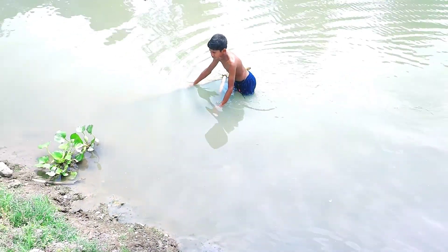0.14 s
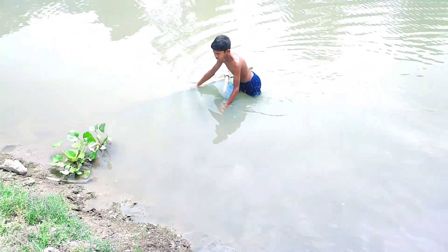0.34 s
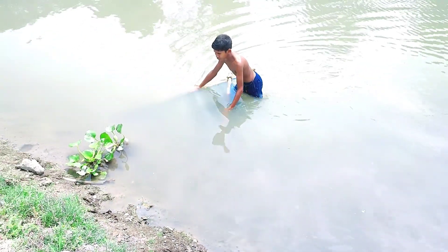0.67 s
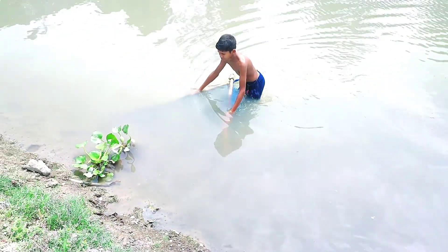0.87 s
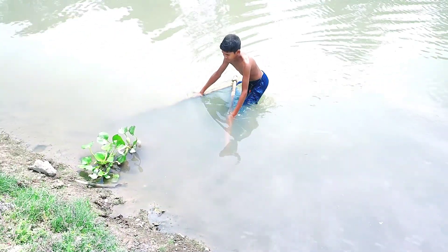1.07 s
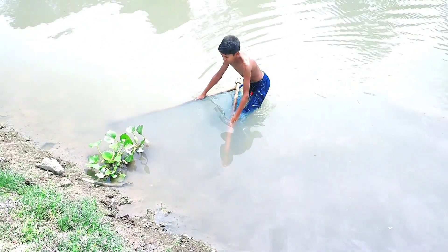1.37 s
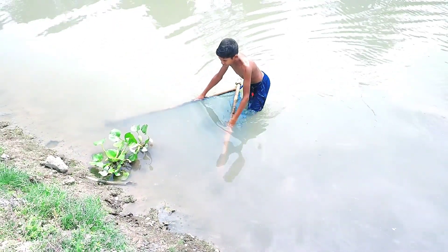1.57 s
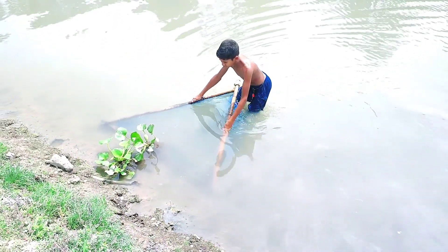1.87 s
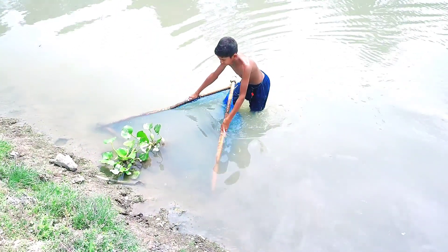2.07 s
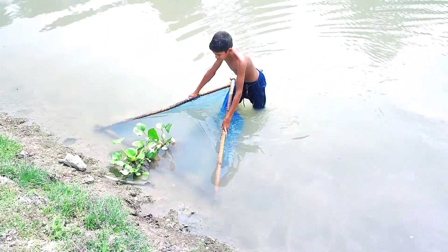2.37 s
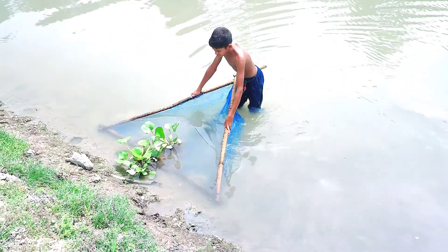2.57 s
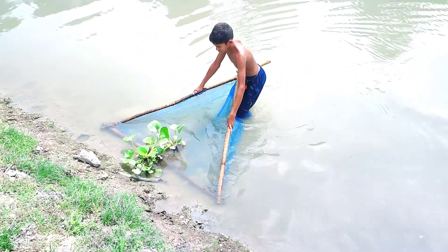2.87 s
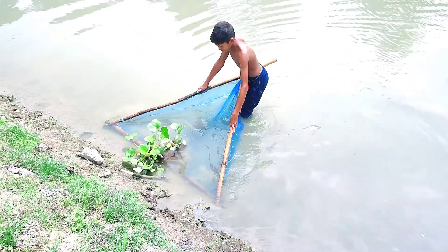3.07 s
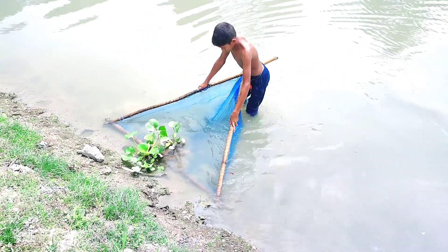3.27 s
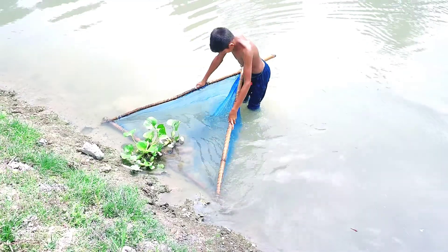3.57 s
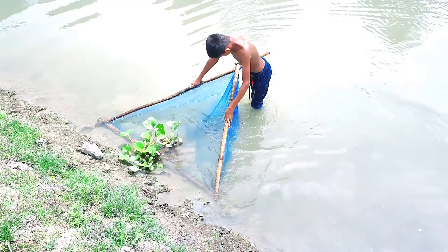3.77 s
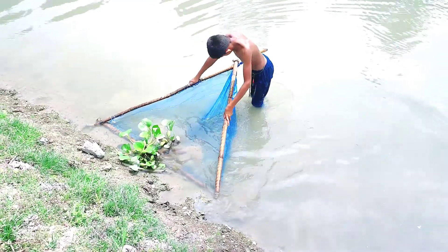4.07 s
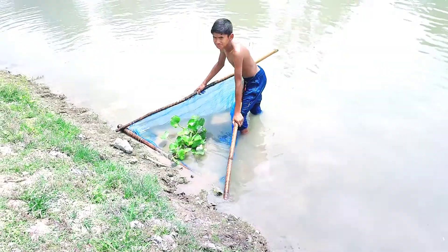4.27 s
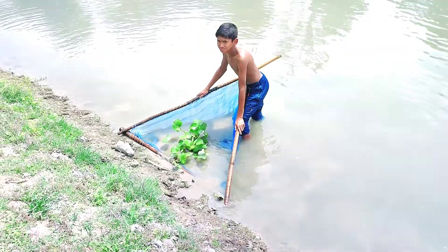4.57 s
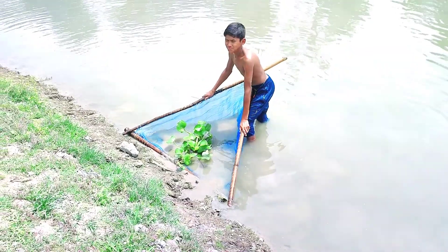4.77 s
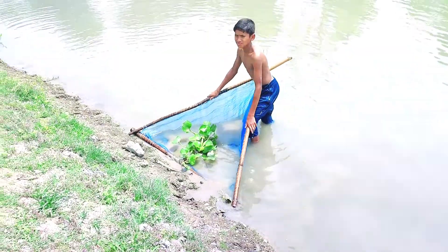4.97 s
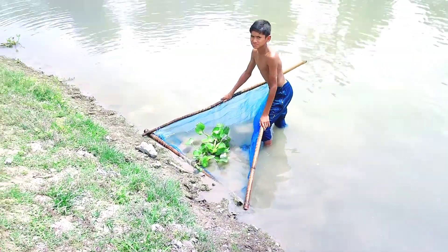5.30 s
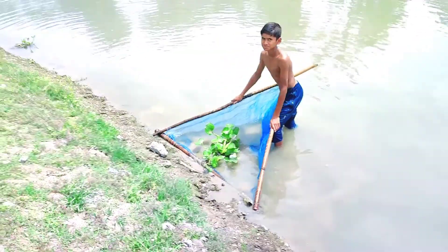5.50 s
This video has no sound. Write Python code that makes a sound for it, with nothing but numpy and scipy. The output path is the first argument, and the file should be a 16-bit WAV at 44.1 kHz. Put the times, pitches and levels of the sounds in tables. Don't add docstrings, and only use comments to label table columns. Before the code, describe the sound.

A close cicada dominates from the start, right of centre: short, dry, buzzing rasps around 5 to 7 kHz, roughly seven a second, over a thin grainy chorus of far insects and a very quiet wash of water and leaves. A soft wind flutter touches the microphone near 0.35 s; dry camera-body ticks follow, clearest at 1.1 s and 2.7 s. From about 2 to 3.9 s a faint bird gives short upward whistles, every quarter second. The rasps quicken to about nine or ten a second after 3 s, peak around 3.7 to 4.0 s, then become weaker and duller. Tiny watery blips and plops ring faintly at 3.5 to 4.1 s. From 4.9 s a second insect flicks its wings rapidly on the left. Wind and hand rustling build after 5 s, with low buffets and a strong thump on the right near 5.57 s.

```python
import sys
import numpy as np
from scipy import signal
from scipy.fft import rfft, irfft
from scipy.io import wavfile
from scipy.ndimage import uniform_filter1d

SR = 44100
rng = np.random.default_rng(int(sys.argv[2]) if len(sys.argv) > 2 else 0)


def to_linear_factor(level_db):
    exponent = np.asarray(level_db, float) / 20
    return 10 ** exponent


def persist_wave(psi):
    counts = np.round(np.clip(psi, -1, 1) * 32767).astype(np.int16)
    wavfile.write(sys.argv[1], SR, np.atleast_2d(counts).T)


N = 248724
CLOCK = np.arange(N) / SR

# start in seconds, peak in dB, length in
# seconds.
CICADA_PHRASES = [(-.04, -39.5, 0.081), (.115, -39, 0.091), (.267, -38.5, .082), (0.427, -39, 0.088),
                  (0.578, -39.5, 0.071), (0.729, -39.5, 0.06), (0.856, -39, 0.074), (1.001, -37, 0.076),
                  (1.154, -36.5, 0.073), (1.304, -36.5, 0.087), (1.442, -36, 0.067), (1.531, -43.5, 0.054),
                  (1.571, -36.5, 0.079), (1.704, -37, 0.077), (1.848, -37.5, 0.079), (1.979, -37.5, 0.099),
                  (2.109, -39, 0.13), (2.236, -37.5, 0.083), (2.36, -37, .084), (2.502, -37, 0.076),
                  (2.629, -37.5, 0.091), (2.748, -37, 0.059), (2.824, -40.5, .065), (2.864, -36.5, 0.056),
                  (2.983, -36.5, 0.062), (3.107, -35, .067), (3.234, -34.5, 0.072), (3.357, -36, 0.087),
               (3.471, -35, 0.083), (3.568, -34.5, 0.066), (3.658, -38, .065), (3.685, -32.5, .055),
               (3.7955, -32, 0.065), (3.904, -31.5, .07), (4.017, -32, 0.08), (4.129, -34.5, 0.045),
               (4.228, -37, 0.053), (4.335, -39, 0.071), (4.434, -39, .056), (4.539, -38.5, .051),
               (4.634, -38, .039), (4.727, -37.5, 0.045), (4.814, -38.5, 0.055), (4.901, -39.5, 0.07),
               (5.014, -41, .08), (5.108, -41.5, 0.045), (5.179, -40, 0.075), (5.294, -41.5, 0.072),
               (5.389, -42, 0.061), (5.48, -41, 0.05), (5.572, -47.5, 0.057)]
# time in seconds, left over right in dB, low rib band in dB,
# treble reaching the ports in dB.
BEARING = [(0, -14, -1, -8), (.8, -11, 2.5, -6.5), (1.5, -10, -2, -10.5), (1.95, -9, -4, -9),
           (2.25, -10.5, -1, -11.5), (3.1, -13, -1, -5.5), (3.9, -17, -3.5, -13.5), (4.3, -14, 1, -17),
           (4.8, -12, 1, -17.5), (5.64, -7, 1.5, -2)]
# time in seconds, level in dB, left over right in dB.
CHORUS_LEVEL = [(0, -48, -10), (2.1, -50.5, -10), (3.2, -50.5, -16), (4.0, -48.5, -15), (4.5, -50.5, -6),
                (5.4, -50.5, -16), (5.64, -53.5, -3)]
# frequency in Hz, density in dB per Hz.
CHORUS_COLOUR = [(2350, -77), (4000, -14), (4200, -59), (4450, 0.5), (4670, -22), (5370, -5.5), (6580, -5),
                 (8290, -8.5), (10100, -9), (10900, -13), (11400, -14), (13100, -11.5), (14400, -13)]
# time in seconds, strength in dB.
BREEZE = [(0, -57), (.9, -56), (1.4, -59), (3.7, -59), (4.1, -57), (4.8, -55), (5.0, -46.5), (5.2, -43),
          (5.5, -42.5), (5.64, -34.5)]
# middle in seconds, peak in dB, half length in seconds, left over right in dB.
GUSTS = [(0.243, -50, 0.027, -11), (0.305, -50.5, 0.024, 13), (0.352, -40.5, 0.015, -22),
         (.53, -48, 0.086, -0.5), (0.75, -49, 0.064, -4), (3.87, -57, 0.049, 7), (4.194, -51, 0.11, -3),
         (4.263, -55.5, 0.027, -10), (4.455, -53, 0.036, 15), (4.571, -44.5, .035, 1),
         (4.951, -46, 0.035, 20), (5.155, -41.5, 0.05, -1), (5.214, -42, 0.029, -1), (5.34, -45.5, .04, 19),
         (5.57, -35.5, .04, -13)]
# time in seconds, peak in dB, length in seconds (minus for suction),
# left over right in dB.
BUFFETS = [
    (.357, -32, -.006, -14),
    (5.527, -25, .005, -14),
    (5.57, -15.5, .0036, -18),
    (5.618, -25, -.006, -10),
]
# time in seconds, level in dB.
AIR_LEVEL = [(0, -66), (2.7, -65), (3.93, -66.5), (4.6, -70), (5.07, -66.5), (5.64, -69.5)]
# frequency in Hz, density in dB per Hz.
AIR_COLOUR = [(71, -6.5), (120, -1.5), (214, -6.5), (372, -7), (425, -9.5), (963, -11), (1150, -13),
              (1280, -13), (1440, -14), (2420, -10), (3800, -11.5), (4250, -11), (5460, -57), (9240, -120)]
# frequency in Hz, left-right likeness from 0 to 1.
AIR_LIKENESS = [(200, 0.78), (500, 0.51), (900, 0.038), (1500, 0.0067)]
# time in seconds, peak in dB, left over right in dB.
LONE_CLICKS = [
    (.098, -42, -9),
    (.411, -42, -8),
    (.693, -37, -8),
    (.845, -40, -8),
    (.985, -38.5, -17),
    (1.123, -38, -12),
    (1.134, -46, -8),
    (1.273, -48, -10),
    (1.289, -43, -11),
]
# start in seconds,
# length in seconds, rms in dB, centre in Hz, spread in octaves.
RUSTLES = [(.58, 0.2, -66.5, 2440, 0.5), (1.049, 0.055, -59, 980, 0.67), (1.624, .15, -62, 2350, 1.1),
           (4.808, .15, -63.5, 3490, 0.14), (4.878, 0.16, -67.5, 1524, 0.95),
           (5.062, 0.019, -50, 146, 0.28), (5.131, 0.036, -44, 229, 0.54), (5.164, 0.045, -57, 1670, 0.69),
           (5.263, .012, -51, 1340, 1.06), (5.446, 0.009, -52.5, 2200, 1.3),
           (5.46, 0.052, -43.5, 1800, 1.3), (5.5, 0.035, -64, 2200, .9), (5.51, 0.041, -48.5, 188, 0.43),
           (5.558, .05, -42.5, 228, 0.44)]
# time in seconds, peak in dB, pitch in Hz, length in cycles.
TICKS = [(.688, -36.5, 554, 1), (.742, -51, 528, 1.7), (.948, -50, 743, 2.1), (1.054, -34, 1040, 3.8),
         (1.082, -24, 950, 3.46), (1.17, -41.5, 1000, 2.8), (1.295, -46, 805, 1.7), (1.32, -42, 1120, 3.9),
         (2.472, -57, 910, 2.8), (2.5, -46, 706, 3.1), (2.519, -37.5, 660, 2.2), (2.574, -56, 517, 2.4),
         (2.676, -32, 1850, 1.06), (2.944, -49, 510, 1.8), (2.952, -39, 825, 2.5), (3.016, -45, 1010, 4.2),
         (3.042, -38.5, 770, 2.4), (3.314, -51.5, 690, 2.8), (3.528, -46, 1180, 1.3),
         (4.111, -43.5, 630, 1.6)]
# start in seconds, length in seconds, loudest level in dB.
BIRD_NOTES = [
    (1.99, 0.046, -57),
    (2.254, .078, -62.5),
    (2.555, 0.066, -57),
    (2.816, 0.073, -50.5),
    (3.083, 0.061, -51.5),
    (3.339, .072, -49.5),
    (3.597, 0.083, -54.5),
    (3.863, 0.072, -53.5),
]
# start in seconds, peak in dB, pitch in Hz, rise as a factor, time to fall 60 dB in seconds.
BUBBLES = [
    (3.527, -55, 1194, 1.02, 0.11),
    (3.884, -50, 694, 1.1, 0.13),
    (3.903, -52, 2450, .89, 0.053),
    (3.927, -45.5, 2390, 1.06, 0.053),
    (3.988, -55.5, 945, 1.04, 0.092),
    (4.057, -62, 870, .73, .1),
    (4.085, -59, 895, 1.06, .061),
]
# frequency in Hz, threshold in dB.
MASK = [(900, -14), (1500, -4.2), (3000, -3), (4150, -.5), (4500, -9), (9800, -9), (10900, -1),
        (11700, 1.5), (12600, 0), (14000, -.5)]


def evened(x):
    return x / np.sqrt(np.mean(x ** 2) + 1e-20)


def read(points, hz):
    f, value = np.transpose(points)
    return np.interp(np.log(hz + 1), np.log(f + 1), value)


def sides(pan_db):
    ratio = to_linear_factor(np.asarray(pan_db))
    return np.sqrt(2 / (1 + ratio ** 2)) * np.array([ratio, np.ones_like(ratio)])


def add(mix, start, sound, pan_db):
    part = mix[:, round(start * SR):][:, :sound.shape[-1]]
    part += (sides(pan_db)[:, None] * sound)[:, :part.shape[1]]


def band(x, lo_hz, hi_hz):
    return signal.sosfilt(signal.cheby2(10, 45, [lo_hz, hi_hz], "bandpass", fs=SR, output="sos"), x)


def resonate(x, hz, width_hz):
    turn = np.exp(2j * np.pi * np.cumsum(hz * np.ones(x.shape[-1])) / SR)
    r = np.exp(-np.pi * width_hz / SR)
    return 2 * (turn * signal.lfilter([(1 - r) ** 2], [1, -2 * r, r * r], x / turn)).real


def noise(colour_db, size, same=0., patchy_db=0., flicker_db=0.):
    hop, hz = size // 4, np.fft.rfftfreq(size, 1 / SR)[:, None]
    frames = N // hop + 5
    a, b, c, d, patches = rng.standard_normal((frames, len(hz), 5)).T
    patches = uniform_filter1d(patches, size=size // 64, axis=0)
    patches = evened(uniform_filter1d(patches, size=6, axis=1))
    flicker = rng.standard_normal((frames, 2)).T[:, None]
    left = a + 1j * b
    right = same * left + np.sqrt(1 - same ** 2) * (c + 1j * d)
    level_db = colour_db(hz, np.arange(frames) * hop / SR) + patchy_db * patches + flicker_db * flicker
    z = np.array([left, right]) * to_linear_factor(level_db)
    return signal.istft(z, nperseg=size, noverlap=size - hop)[1][:, :N]


def buckling(age, per_s, uneven, size_db, hiss):
    index = np.arange(N)
    wander = np.cumsum(evened(uniform_filter1d(rng.standard_normal(N), size=300))) / SR
    wander -= wander[index - np.minimum(age * SR, index).astype(int)]
    turns = per_s * (age + uneven * wander)
    burst_start = (index - turns % 1 / per_s * SR).astype(int)
    luck = rng.standard_normal(N)[burst_start // 128]
    burst = to_linear_factor(size_db * luck) * np.exp(-(turns % 1) / .35)
    return evened((hiss + evened(burst)) * rng.standard_normal((2, N)))


def cicada():
    rows = np.array(CICADA_PHRASES)
    phrase = np.searchsorted(rows[:, 0], CLOCK) - 1
    start, peak_db, length = rows[phrase].T
    s, *view = np.transpose(BEARING)
    pan_db, low_db, high_db = (np.interp(CLOCK, s, column) for column in view)
    age = CLOCK - start
    u = (age / length).clip(0, 1)
    pitch_luck, treble_luck = uniform_filter1d(rng.standard_normal((60, 2))[phrase].T, size=60)

    after_db = -7 * np.tanh(np.maximum(age - length + 0.0048, 0) / 0.012) - 170 * np.maximum(age - length, 0)
    snap_db = 1.8 * np.exp(-age / .006)
    level = uniform_filter1d(to_linear_factor(peak_db - 9.5 + snap_db + after_db), size=30)
    swell = to_linear_factor(-18 * (u - .55) ** 2)
    lift = uniform_filter1d(1 - np.exp(-age / 0.028), size=60)

    drive = buckling(age, per_s=285, uneven=0.18, size_db=-2.5, hiss=1.0)
    ridge = evened(resonate(drive, 5900 + 1150 * lift + 150 * pitch_luck, 1020))
    main = ridge + to_linear_factor(-2.0) * evened(resonate(drive, 6440, 1600))
    main = main * to_linear_factor(-2.0 - 10.7 * (u - .4) ** 2)
    low = evened(resonate(drive, 4700 + 200 * lift, 700)) * to_linear_factor(low_db - 2.0 - 6.6 * u)
    wide = evened(band(drive, 4740, 10550))
    high = evened(resonate(drive, 10170, 1360)) + to_linear_factor(4.5) * wide
    high = high + to_linear_factor(-3.5) * evened(resonate(drive, 13360, 1300))

    shade = sides(pan_db)
    song = shade * main + shade * to_linear_factor([[2.5], [-.4]]) * low
    song = song + sides(0.034 * pan_db) * to_linear_factor(high_db - 2.5 + 1.5 * treble_luck) * swell * high
    return band(level * song, 4200, 16500)


def chorus():
    s, db, pan_db = np.transpose(CHORUS_LEVEL)
    far = noise(lambda hz, t: read(CHORUS_COLOUR, hz) + 0 * t, size=256, patchy_db=3.5, flicker_db=1.4)
    hum = evened(resonate(rng.standard_normal((2, N)), 6750, 1200))
    blend = to_linear_factor(-4) * evened(far) + to_linear_factor(-5.0) * sides(np.interp(CLOCK, s, pan_db)) * hum
    return to_linear_factor(np.interp(CLOCK, s, db)) * blend


def wind():
    s = CLOCK[::256]
    power = to_linear_factor(np.interp(s, *np.transpose(BREEZE))) ** 2 * np.ones((2, 1))
    for at, peak_db, half, pan_db in GUSTS:
        power = power + (to_linear_factor(peak_db) * sides(pan_db)[:, None]) ** 2 * np.exp(-2 * ((s - at) / half) ** 2)
    port_db = 10 * np.log10(power)

    def colour_db(hz, t):
        gust_db = np.array([np.interp(t, s, p) for p in port_db])[:, None]
        corner_hz = 90 * to_linear_factor(0.35 * (gust_db + 50.5))
        shape_db = -3.5 * np.log2(hz / 40 + 0.13) - 10 * np.log10(1 + (hz / corner_hz) ** 7)
        shape_db = shape_db - 10 * np.log10(1 + (16 / (hz + 1)) ** 4)
        return shape_db - 10 * np.log10((10 ** (shape_db / 10)).sum(1, keepdims=True))

    lumps = evened(noise(colour_db, size=2048, same=0.065, flicker_db=3.5))
    out = to_linear_factor(np.array([np.interp(CLOCK, s, p) for p in port_db]) + 3.5) * lumps
    for at, peak_db, length, pan_db in BUFFETS:
        way, length = np.sign(length), abs(length)
        u = np.arange(-4 * length, 8 * length, 1 / SR) / length
        push = np.exp(-u ** 2 * 2) - 0.17 * np.exp(-(u - 1.5) ** 2)
        add(out, at - 4 * length, way * to_linear_factor(peak_db) * push, pan_db)
    return out


def air():
    s, db = np.transpose(AIR_LEVEL)
    same = np.clip(read(AIR_LIKENESS, np.fft.rfftfreq(1024, 1 / SR)), 0, 1)[:, None]
    wash = noise(lambda hz, t: read(AIR_COLOUR, hz) + 0 * t, size=1024, same=same, patchy_db=2.5, flicker_db=1.0)
    return to_linear_factor(np.interp(CLOCK, s, db) + 5) * sides(-1.5)[:, None] * evened(wash)


def flicks():
    first_s, period_s, jitter_s = 4.8614, .0431, .003
    level_db, pan_db, scatter_db = -39.5, 13, 2.0
    out, t = np.zeros((2, N)), np.arange(900) / SR
    at = np.arange(first_s, N / SR, period_s)
    luck = rng.standard_normal((40, 3))[:len(at)].T
    beats = np.transpose([at + jitter_s * luck[0], level_db + scatter_db * luck[1], pan_db + scatter_db * luck[2]])
    for rows, hz, width_hz, t60 in ((beats, 8300, 4500, .03), (LONE_CLICKS, 5800, 2500, .015)):
        for start, db, side_db in rows:
            puff = evened(resonate(rng.standard_normal((2, len(t))), hz, width_hz))
            fade = to_linear_factor(db - 5.5 - 60 * t / t60) * np.minimum(t / 0.00075, 1)
            add(out, start, fade * puff, side_db)
    return out


def rustles():
    out = np.zeros((2, N))
    for start, length, db, centre_hz, spread in RUSTLES:
        n = round(length * SR)
        grit = rng.standard_normal((2, n)) * to_linear_factor(1.8 * rng.exponential(1, (2, n)))
        octaves = np.log2((np.fft.rfftfreq(n, 1 / SR) + 1) / centre_hz)
        rub = evened(irfft(rfft(grit) * np.exp(-.5 * (octaves / spread) ** 2), n))
        pan_db = -24 if start > 5 else -3
        add(out, start, to_linear_factor(db + 5.0) * rub * signal.windows.tukey(n, .6), pan_db)
    return out


def ticks():
    out = np.zeros((2, N))
    for start, db, hz, cycles in TICKS:
        u = np.arange(round(3 * cycles / hz * SR)) * hz / SR
        shape = (u / cycles * 4.33) ** 2 * np.exp(2 - u / cycles * 7.86) + 0.073 * np.exp(-u / cycles)
        ring = np.sin(2 * np.pi * u) + to_linear_factor(-22.5) * np.sin(2 * np.pi * 2.95 * u)
        add(out, start + 0.00058, to_linear_factor(db) * shape * ring * np.minimum(u * 1.03, 1), 2)
    return out


def bird():
    first_hz, last_hz, first_db = 2725, 3994, -68
    out = np.zeros((2, N))
    for start, length, last_db in BIRD_NOTES:
        u = np.arange(0, 1, 1 / SR / length)
        pitch = first_hz + (last_hz - first_hz) * u ** 2.0
        size = to_linear_factor(first_db + (last_db - first_db) * u + 1.5)
        size *= np.minimum(u / 0.12, 1) * np.minimum((1 - u) / 0.031, 1)
        size *= to_linear_factor(4.5 * evened(uniform_filter1d(rng.standard_normal(len(u)), size=150)))
        add(out, start, size * np.sin(2 * np.pi * np.cumsum(pitch) / SR), -5.5)
    taps = rng.standard_normal((2, 1500)) * (rng.random((2, 1500)) < .03)
    taps = taps * to_linear_factor(-60 * np.arange(1500) / SR / 0.14)
    return out + to_linear_factor(-3) * signal.oaconvolve(out, taps / np.linalg.norm(taps[0]), axes=1)[:, :N]


def bubbles():
    out = np.zeros((2, N))
    for start, db, hz, rise, t60 in BUBBLES:
        t = np.arange(0, t60 / 2, 1 / SR)
        pitch = hz * rise ** (t / t60 * 4.5)
        fade = to_linear_factor(db - 60 * t / t60) * np.minimum(t / 0.0011, 1)
        add(out, start, fade * np.sin(2 * np.pi * np.cumsum(pitch) / SR), -1.5)
    return out


def scene():
    insects = cicada() + chorus() + flicks()
    weather = wind() + air()
    handling = rustles() + ticks()
    return insects + weather + handling + bird() + bubbles()


def thinned(x):
    frame = dict(window=signal.windows.cosine(2048), nperseg=2048, noverlap=1024)
    lead = 1024 - 407
    hz, _, z = signal.stft(np.pad(x, ((0, 0), (lead, 0))), SR, **frame)
    power = uniform_filter1d((abs(z) ** 2).mean(0), size=5, axis=0) + 1e-20
    usual = uniform_filter1d(np.median(power, axis=1), size=9)[:, None]
    now = np.exp(uniform_filter1d(np.log(power / usual), size=40, axis=0))
    kept = power > usual * now ** .35 * to_linear_factor(read(MASK, hz))[:, None] ** 2
    return signal.istft(z * kept, SR, **frame)[1][:, lead:lead + N]


def top_cut(x):
    return signal.sosfilt(signal.butter(12, 15100, fs=SR, output="sos"), x)


def record(dry):
    ending = np.minimum((CLOCK[-1] - CLOCK) / .004, 1)
    edge = signal.firwin(511, 14300, window=("kaiser", 9), fs=SR)
    mix = thinned(signal.oaconvolve(dry * ending, edge[None], "same"))
    return top_cut(mix)


dry = scene()
out = record(dry)
persist_wave(out)
```